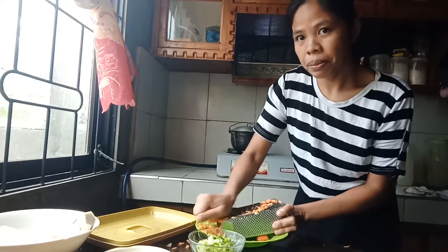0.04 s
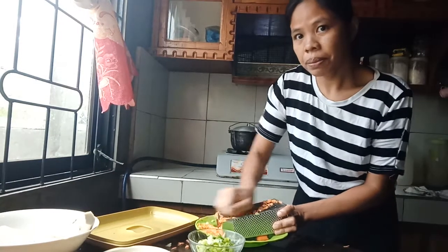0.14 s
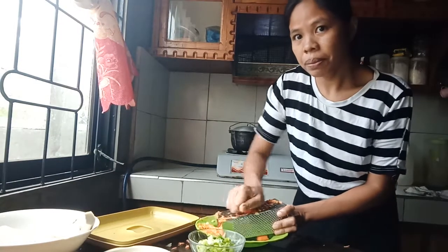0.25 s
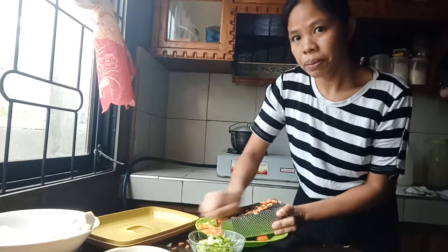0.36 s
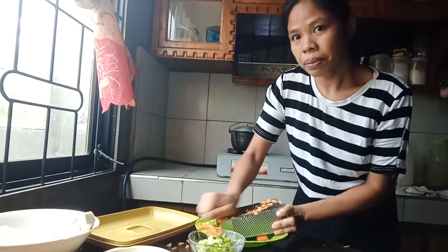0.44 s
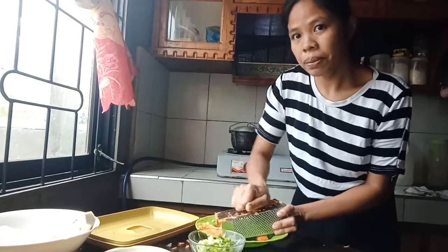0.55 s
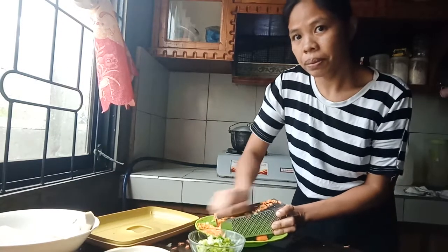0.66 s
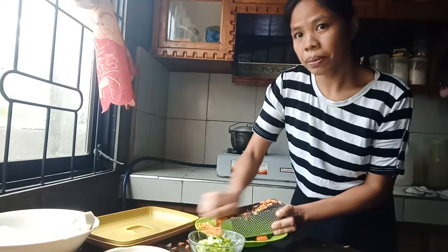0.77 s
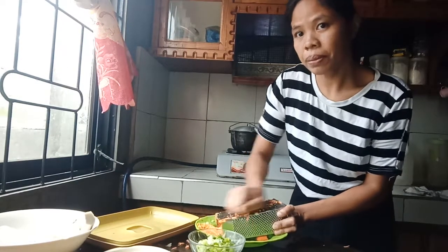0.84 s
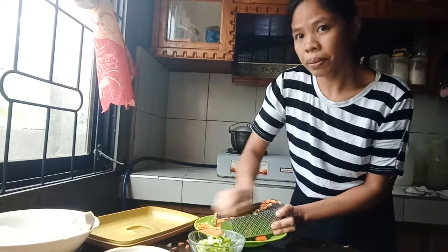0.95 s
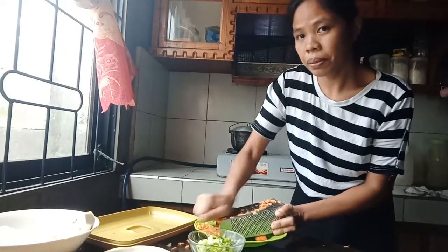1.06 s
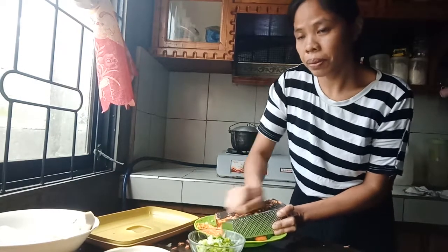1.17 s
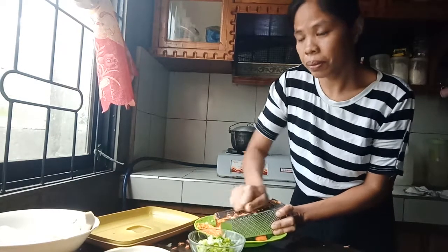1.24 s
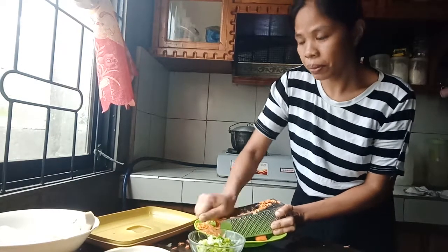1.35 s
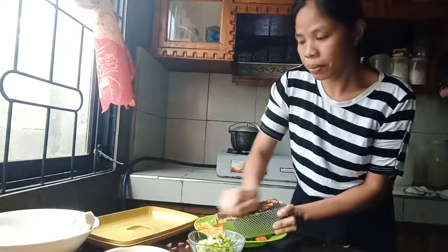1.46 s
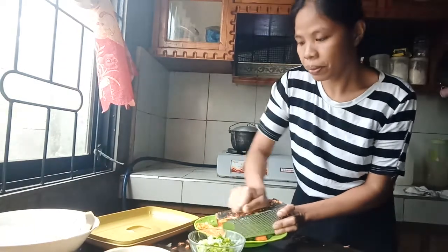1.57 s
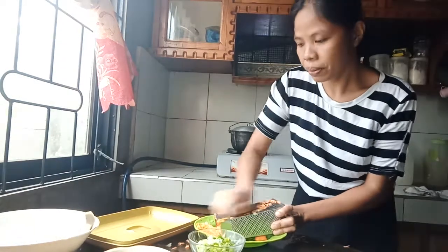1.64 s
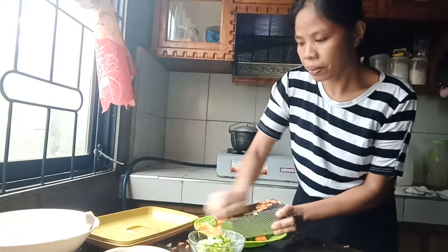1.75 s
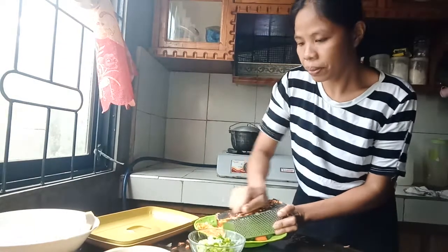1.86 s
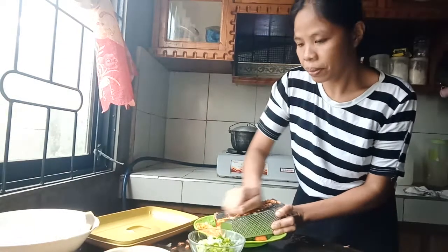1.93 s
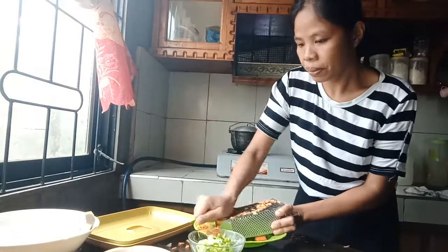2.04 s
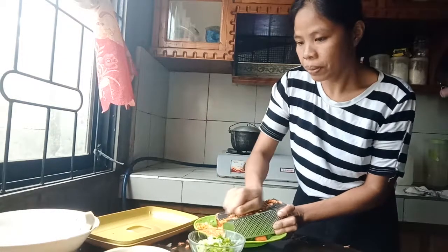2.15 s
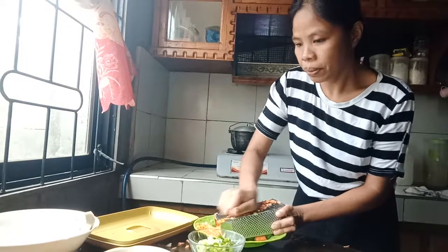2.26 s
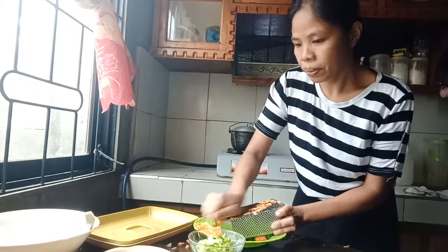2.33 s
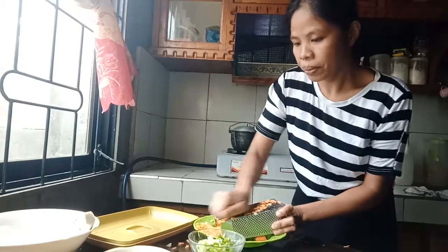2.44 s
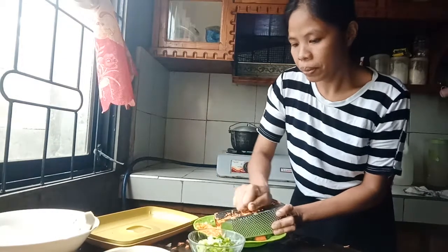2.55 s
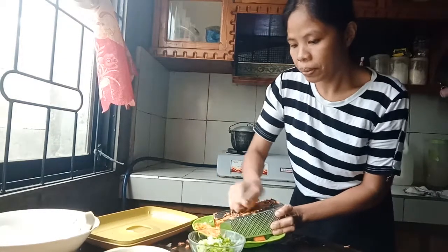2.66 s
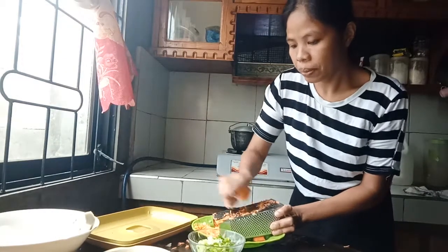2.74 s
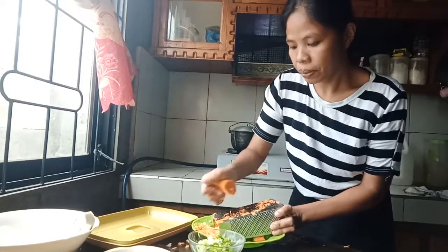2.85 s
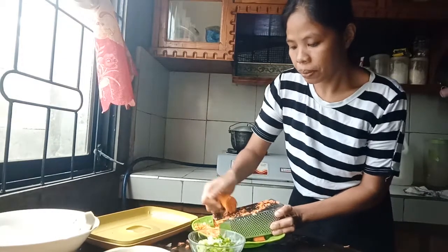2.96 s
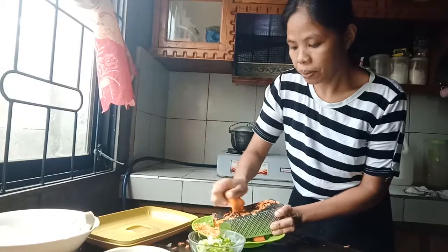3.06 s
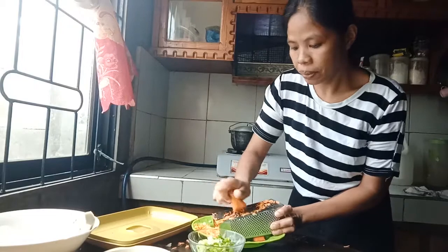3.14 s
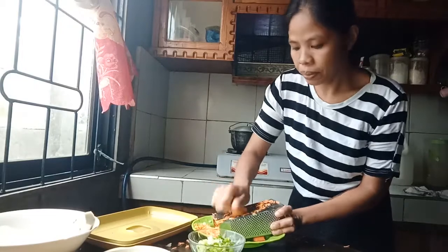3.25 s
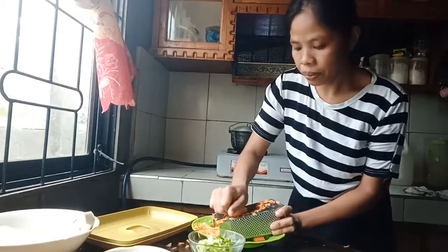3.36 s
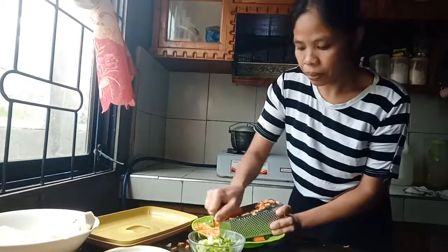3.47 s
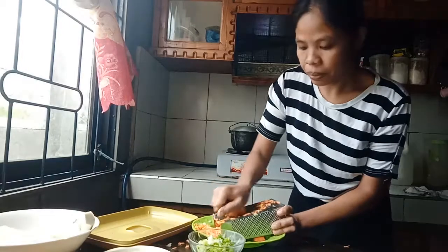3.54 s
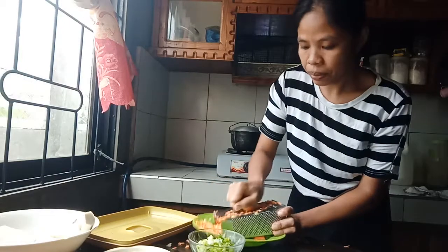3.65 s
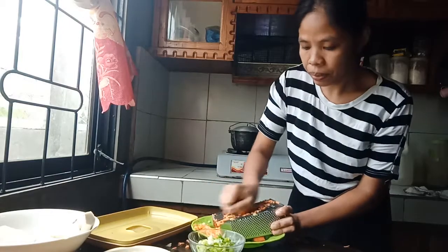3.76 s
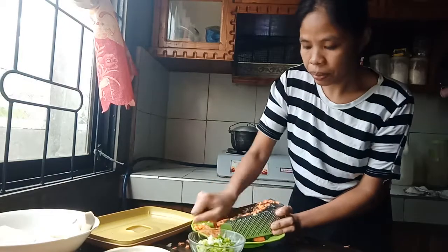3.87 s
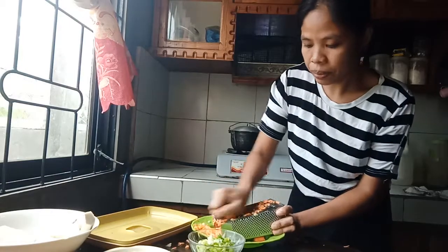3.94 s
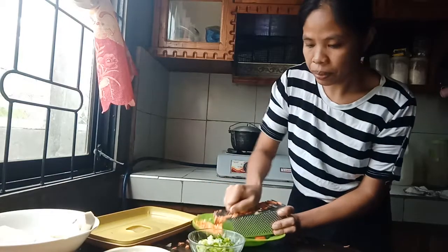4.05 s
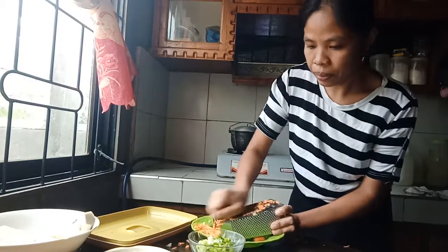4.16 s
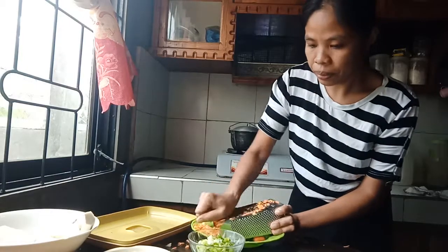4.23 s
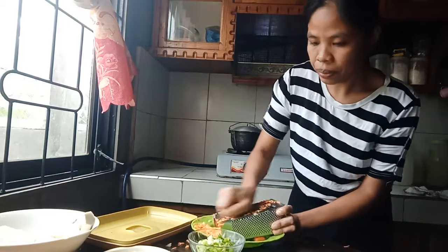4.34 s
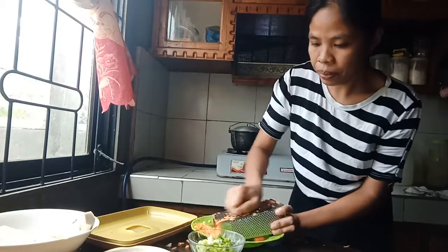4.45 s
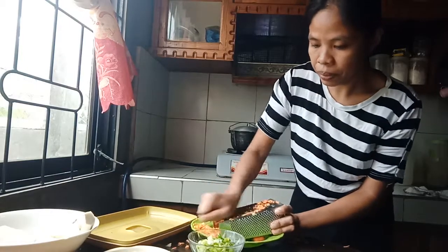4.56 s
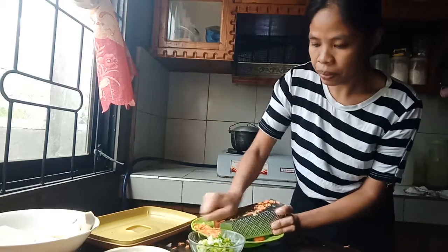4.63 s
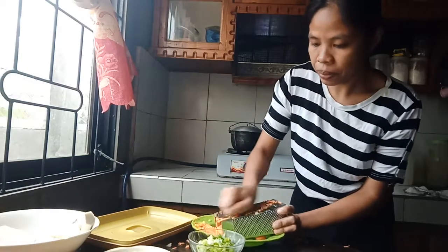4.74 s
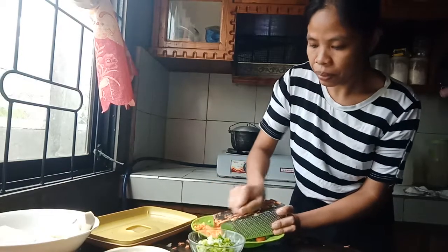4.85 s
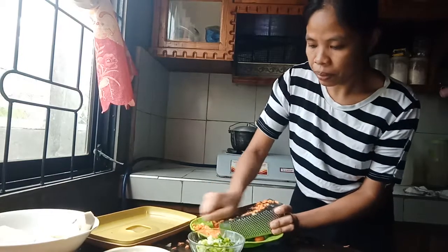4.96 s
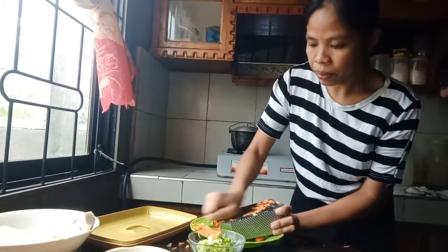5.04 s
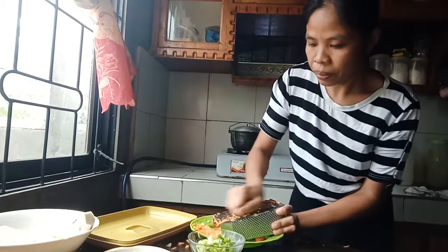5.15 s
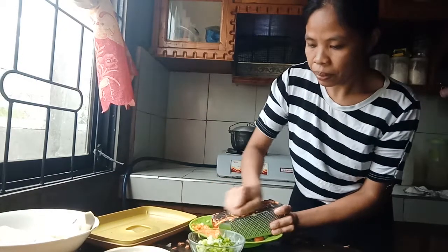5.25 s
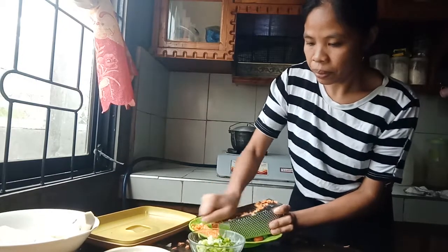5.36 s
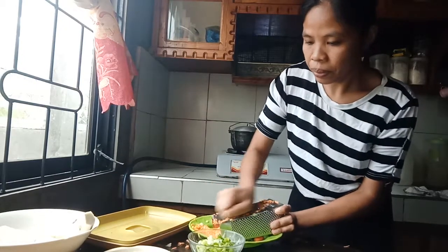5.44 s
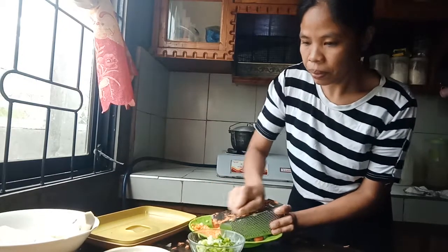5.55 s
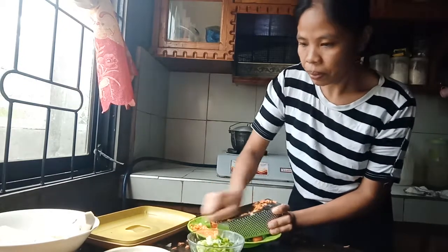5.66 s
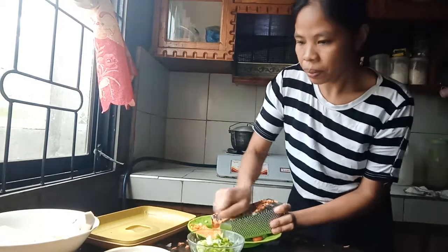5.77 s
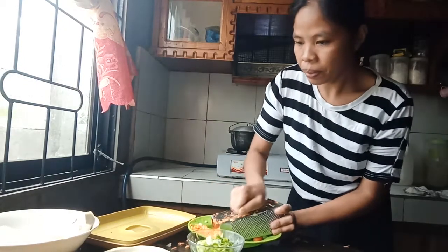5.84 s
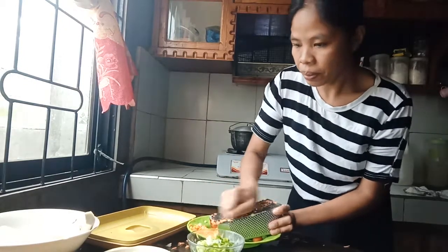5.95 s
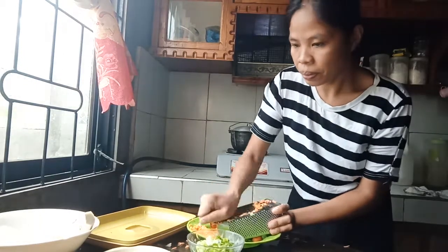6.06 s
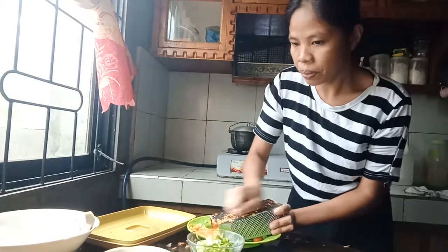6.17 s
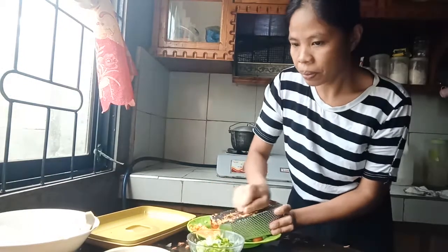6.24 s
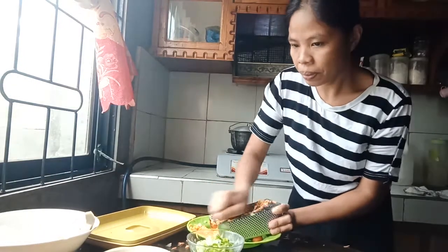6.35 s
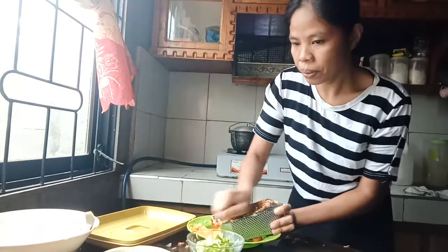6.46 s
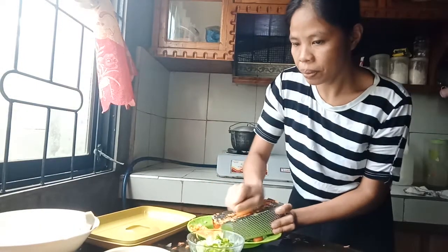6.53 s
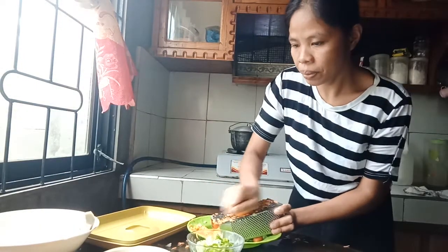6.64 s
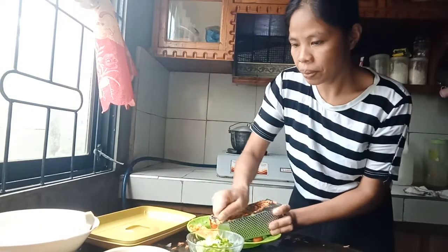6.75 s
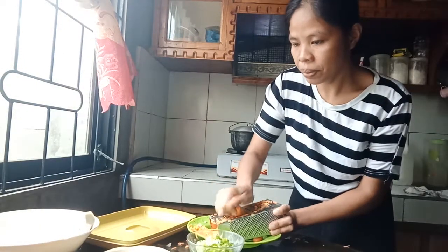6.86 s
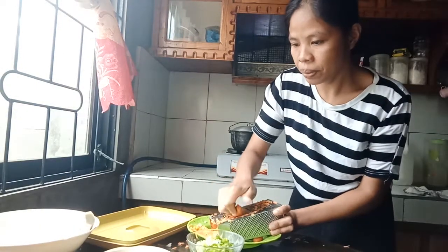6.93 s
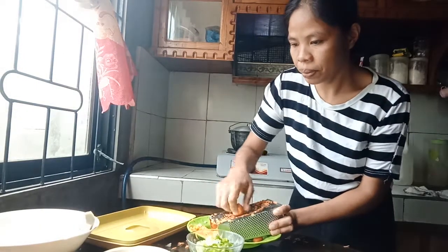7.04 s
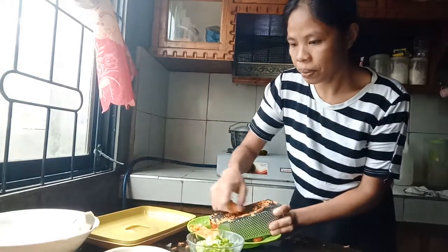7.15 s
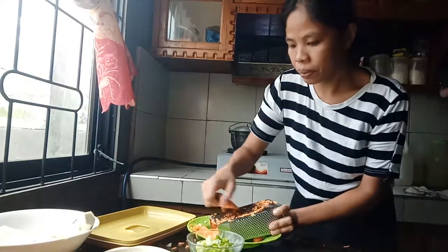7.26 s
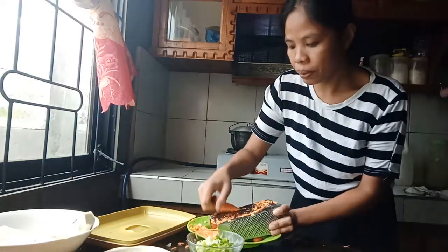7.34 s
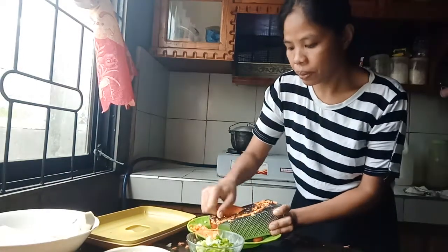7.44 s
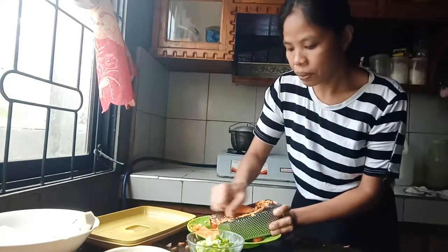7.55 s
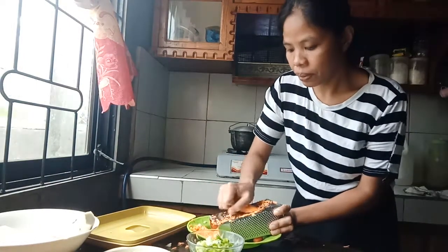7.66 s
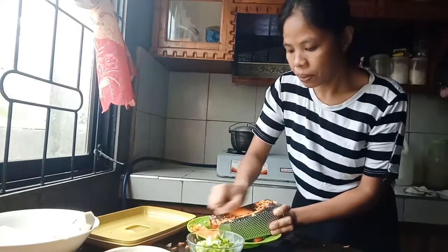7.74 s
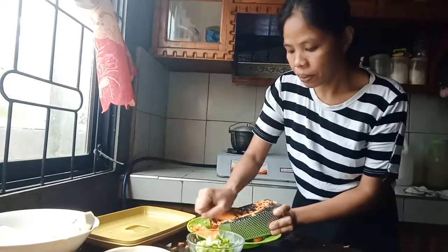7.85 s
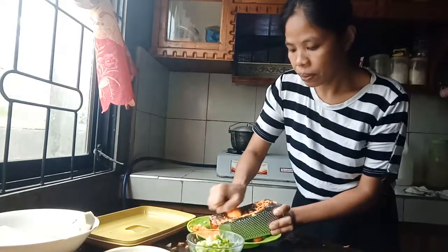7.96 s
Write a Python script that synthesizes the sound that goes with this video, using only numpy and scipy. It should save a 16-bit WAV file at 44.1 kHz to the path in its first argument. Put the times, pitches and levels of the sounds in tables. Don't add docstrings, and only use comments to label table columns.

```python
import sys
import numpy as np
from scipy import signal
from scipy.fft import rfft, irfft
from scipy.io import wavfile
from scipy.ndimage import uniform_filter1d

SR = 44100
rng = np.random.default_rng(int(sys.argv[2]) if len(sys.argv) > 2 else 0)


def to_wav(sig):
    pcm = np.clip(np.atleast_2d(sig), -1, 1) * 32767
    pcm = np.round(pcm).astype(np.int16)
    wavfile.write(sys.argv[1], SR, pcm.T)


def to_linear_factor(level_db):
    exponent = np.asarray(level_db, float) / 20
    return 10 ** exponent


N = 352800

# f/Hz, level/dB per Hz
GRATER_SPECTRUM = [(18, -60.5), (30, -30.5), (58, -9), (114, -6.5), (332, -5.5), (420, 3.5), (492, -4.5),
                   (639, 0), (2020, -5.5), (2620, -6.5), (4420, -14), (5310, -23.5), (6540, -22.5),
                   (9680, -37), (15500, -37.5)]
# t/s, peak level/dB, brightness/dB, time until clamped/s, board pitch f/Hz
KNOCKS = [(3.7345, 4, -11.5, 0.02, 772), (4.061, -6, -6, 0.011, 938), (4.093, 6.5, -11.5, 0.017, 779),
          (4.46, 6.5, -13, 0.019, 772), (4.873, 4, -10.5, 0.02, 804), (5.113, -10, -8, 0.016, 820),
          (5.2115, -1, -14, 0.019, 794), (5.411, -26.5, -1.5, 0.019, 740), (5.55, 3.5, -7, 0.017, 813),
          (5.608, -7.5, -2, 0.011, 1110), (5.895, -4.5, -4, 0.014, 890), (6.561, -20, -1.5, 0.017, 790)]
SOFT_BLOW_DULLING = 0.78


def rms_one(x):
    return x / np.sqrt(np.mean(x ** 2) + 1e-20)


def coloured(x, spectrum, modes=()):
    size = 2 ** 14
    hz = np.maximum(np.fft.rfftfreq(size, 1 / SR), 1)
    spectrum_hz, spectrum_db = np.array(spectrum).T
    db = np.interp(np.log(hz), np.log(spectrum_hz), spectrum_db)
    for mode_hz, width_hz, mode_db in modes:
        db = db + mode_db / (1 + (2 * (hz - mode_hz) / width_hz) ** 2)
    cepstrum = irfft(np.log(to_linear_factor(db)))
    cepstrum[1:size // 2] *= 2
    cepstrum[size // 2 + 1:] = 0
    impulse = irfft(np.exp(rfft(cepstrum)))
    return signal.fftconvolve(x, impulse)[:N]


def band(x, low_hz, high_hz):
    return signal.sosfilt(signal.butter(3, [low_hz, high_hz], "band", fs=SR, output="sos"), x)


def gentle_band(x, low_hz, high_hz):
    return signal.lfilter(*signal.butter(1, [low_hz, high_hz], "band", fs=SR), x)


def resonance(x, hz, width_hz):
    r = np.exp(-np.pi * width_hz / SR)
    return signal.lfilter([1, 0, -1], [1, -2 * r * np.cos(2 * np.pi * hz / SR), r * r], x)


def resonance_twice(x, hz, width_hz):
    return resonance(resonance(x, hz, width_hz), hz, width_hz)


def drift(rate_hz):
    r = np.exp(-2 * np.pi * rate_hz / SR)
    settle = SR // 4
    return rms_one(signal.lfilter([1], [1, -2 * r, r * r], rng.standard_normal(N + settle))[settle:])


def grains(per_s, spread_db, clump_db):
    sizes = to_linear_factor(spread_db * np.minimum(rng.exponential(1, N), 4)) * rng.choice([-1, 1], N)
    happens = rng.random(N) < per_s / SR
    return sizes * happens * to_linear_factor(clump_db * drift(50))


def swells(s, held_s, db, rise_rate, fall_rate, arch_db=0):
    t = np.arange(0, N + 32, 32) / SR
    columns = (s, held_s, db, rise_rate, fall_rate)
    s, held_s, db, rise_rate, fall_rate = [np.reshape(v, (-1, 1)) for v in columns]
    rise = rise_rate * np.maximum(s - t, 0)
    fall = fall_rate * np.maximum(t - s - np.abs(held_s), 0)
    place = np.clip(2 * (t - s) / np.maximum(held_s, .06) - 1, -1, 1)
    levels = db - rise - fall + arch_db * (.5 - place ** 2)
    return np.interp(np.arange(N) / SR, t, np.sqrt(np.sum(to_linear_factor(levels) ** 2, axis=0)))


def torn():
    # f/Hz, width/Hz, level/dB
    plate_modes = [(203, 24, 5), (426, 44, -2.5), (630, 76, 1.5), (800, 60, 4), (1246, 69, 6.5),
                   (1960, 250, -3.5), (2656, 310, 3), (3360, 170, 4.5), (3710, 160, 3), (6180, 420, 5.5)]
    root = coloured(grains(9000, 2.7, 1.3), GRATER_SPECTRUM, plate_modes)
    edges = np.geomspace(350, 5600, 10)
    parts = [gentle_band(root, low, high) for low, high in zip(edges, edges[1:])]
    return root + sum(0.2 * drift(15) * part for part in parts)


def played(root, kinds):
    hiss = rms_one(band(root, 5000, 18000))
    plate = rms_one(band(root, 1900, 4400))
    tray = rms_one(band(root, 25, 1900))
    arch_db = 5
    rounding_s = .006
    powers = np.zeros((3, N))
    for rows, (hiss_fall, plate_fall, tray_fall, tray_db) in kinds:
        s, held_s, hiss_db, plate_re_hiss_db, rise = np.transpose(rows)
        plate_db = hiss_db + plate_re_hiss_db
        powers += np.square([swells(s, held_s, hiss_db, rise, hiss_fall),
                             swells(s, held_s, plate_db, rise, plate_fall, arch_db),
                             swells(s, held_s, plate_db + tray_db, rise, tray_fall, arch_db)])
    rounded = uniform_filter1d(powers, int(rounding_s * SR) + 1, axis=1).clip(0)
    return np.sum(np.sqrt(rounded) * [hiss, plate, tray], axis=0)


def grating():
    # t/s at full speed, held/s, hiss level/dB, plate re hiss/dB, rise/dB per s
    pushes = [
        (0, 0.0064, -52, 15.5, 400),
        (.139, 0.057, -54, 16, 450),
        (.472, 0.056, -52.5, 16.5, 446),
        (.79, 0.048, -51.5, 15.5, 900),
        (1.115, 0.067, -53, 16.5, 500),
        (1.447, 0.068, -55, 16.5, 500),
        (1.777, 0.063, -53.5, 16.5, 402),
        (2.106, 0.063, -56, 18.5, 1000),
        (2.44, 0.091, -57, 17, 497),
    ]
    pulls = [
        (.317, 0.041, -57.5, 15.7, 348),
        (.659, 0.023, -53.5, 13.6, 690),
        (.957, 0.061, -58.5, 13.4, 350),
        (1.301, 0.035, -59, 12.6, 300),
        (1.642, 0.024, -57.5, 15.3, 348),
        (1.957, 0.034, -59, 13.7, 350),
        (2.3, 0.021, -57.5, 16.4, 800),
    ]
    feeble = [
        (3.409, 0.065, -77.5, 14.7, 500),
        (3.585, 0.04, -61, 19.4, 600),
        (6.165, 0.048, -54.5, 18, 285),
        (6.32, 0.055, -60.5, 15.7, 400),
        (6.452, 0.014, -64, 14.4, 800),
        (6.51, 0.021, -61.5, 20.3, 300),
        (6.662, .015, -70, 14, 900),
    ]
    resumed = [
        (7.578, 0.035, -76.5, 17.5, 300),
        (7.735, 0.068, -66.5, 16.4, 300),
        (7.85, 0.05, -70.5, 20.6, 1000),
        (7.95, 0.025, -68.5, 22.2, 300),
    ]
    # t/s at full speed, held/s, hiss level/dB, plate re hiss/dB
    landings = [
        (3.516, 0.0043, -66, 18),
        (3.755, .07, -57, 17),
        (4.112, 0.063, -52.5, 16.5),
        (4.481, 0.077, -52, 18.5),
        (4.893, 0.039, -48, 19.5),
        (5.279, 0.019, -54, 16),
        (5.411, 0.089, -55.5, 19),
        (5.57, 0.047, -58, 19.5),
        (5.914, .06, -85, 29),
        (6.575, 0.058, -69.5, 22.5),
    ]
    ways_back = [
        (3.953, 0.09, -57.5, 19.5),
        (4.293, 0.077, -53, 17),
        (4.653, 0.06, -58, 12),
        (4.748, 0.023, -51.5, 15.5),
        (5.055, 0.11, -53.5, 18),
        (5.739, 0.029, -56, 18.5),
        (5.81, 0.053, -54, 21),
        (5.99, 0.018, -58, 22),
    ]
    # hiss fall/dB per s, plate fall/dB per s, tray fall/dB per s, tray re plate/dB
    push_manner = (211, 161, 134, -2.5)
    pull_manner = (213, 230, 211, -1.5)
    feeble_manner = (206.5, 194, 155, -1.5)
    resumed_manner = (205, 250, 250, -4)
    landed_manner = (204, 171, 149.5, -0.5)
    return_manner = (231.5, 229, 198.5, -2)
    landed = [(*row, 2498.5) for row in landings]
    returns = [(*row, 403) for row in ways_back]
    return played(torn(), [(pushes, push_manner), (pulls, pull_manner), (feeble, feeble_manner),
                           (resumed, resumed_manner), (landed, landed_manner), (returns, return_manner)])


def air():
    # f/Hz, level/dB per Hz
    air_spectrum = [(15, -38), (25, -9.5), (44, -14), (126, -2.5), (215, -7.5), (289, -9), (537, -17),
                    (722, -16), (2010, -21.5), (3090, -19), (5430, -38.5), (6550, -34), (7300, -40),
                    (15500, -39)]
    level_db = -64 + 1.0 * drift(3.9)
    return to_linear_factor(level_db) * rms_one(coloured(rng.standard_normal(N), air_spectrum))


def hum():
    # t/s of the crest, level/dB
    throbs = [(.03, -50), (.35, -62), (.55, -65), (.92, -54), (1.17, -56), (1.39, -53), (1.62, -53),
              (1.87, -52.5), (2.33, -54), (2.65, -57), (3.13, -67), (3.61, -54.5), (4.3, -56.5),
              (4.62, -49.5), (4.77, -50.5), (5.1, -57), (5.49, -55.5), (5.8, -61), (6.37, -49), (6.59, -50),
              (6.85, -58), (7.06, -55), (7.34, -56), (7.52, -56), (7.79, -60)]
    thump_lag_s, thump_db = 0.047, -53.5
    floor_db, sink_db_per_s2 = -70, 1201
    t = np.arange(0, N + 64, 64) / SR
    thumps = [(knock[0] + thump_lag_s, knock[1] + thump_db) for knock in KNOCKS]
    crests = list(throbs) + thumps
    power = to_linear_factor(floor_db) ** 2 + sum(to_linear_factor(db - sink_db_per_s2 * (t - s) ** 2) ** 2 for s, db in crests)
    gain = np.interp(np.arange(N) / SR, t, np.sqrt(power))
    pitch_hz = 121.3 + 3 * drift(5.95)
    return gain * np.sin(2 * np.pi * np.cumsum(pitch_hz) / SR)


def taps():
    # t/s, peak level/dB, pitch f/Hz, t60/s, crack re peak/dB
    tap_rows = [(0.03, -26, 636, 0.03, -24), (0.269, -32.5, 1257, 0.064, 0.5),
                (0.328, -35, 624, 0.06, -25.5), (0.382, -23, 650, 0.043, -15), (0.467, -43, 1310, 0.04, 7),
                (0.576, -37, 1290, 0.085, -2), (1.005, -28.5, 620, 0.069, -16),
                (1.529, -30.5, 773, 0.062, -20), (1.606, -31, 1440, 0.031, -8),
                (1.916, -35.5, 780, 0.03, 4.5), (2.1, -38, 2190, 0.06, -20), (2.265, -32.5, 630, 0.046, -2),
                (2.95, -60.5, 540, 0.075, 2), (3.282, -57.5, 1400, 0.076, 4),
                (3.515, -36.5, 1390, 0.04, -3), (3.698, -35.5, 1233, 0.053, 2.5),
                (4.0345, -31, 1220, 0.09, -2), (5.048, -30, 1630, 0.04, 0), (5.276, -29, 850, 0.031, -22),
                (5.794, -30, 1210, 0.033, 1), (5.498, -29.5, 903, 0.04, -1.5), (6.155, -30, 1805, 0.063, 4),
                (6.75, -27, 984, 0.026, -12), (7.843, -47, 1300, 0.042, 7)]
    noise = rms_one(band(coloured(rng.standard_normal(N), GRATER_SPECTRUM), 500, 4500))
    out, t = np.zeros(N), np.arange(6000) / SR
    for s, db, hz, t60, crack_db in tap_rows:
        at = round(s * SR) + np.arange(len(t))
        mode = np.sin(2 * np.pi * hz * t) + 0.52 * np.sin(2 * np.pi * 1.17 * hz * t)
        mode = mode * (1 - np.exp(-t / 0.00029)) * to_linear_factor(-60 * t / max(t60, .01))
        crack_fall = 2 * to_linear_factor(-60 * t / 0.009) + .15 * to_linear_factor(-60 * t / .25)
        crack = to_linear_factor(crack_db) * noise[at] * (1 - np.exp(-t / 0.00061)) * crack_fall
        out[at] += to_linear_factor(db) * (mode + crack)
    return out


def ticks():
    # t/s, peak level/dB, pitch f/Hz
    tick_rows = [(.1226, -34, 622), (.4544, -33, 2310), (.4658, -22, 3900), (.6574, -34, 3700),
                 (.7811, -33, 3110), (.7921, -30, 1350), (1.1039, -33, 2780), (1.81, -27, 2500),
                 (5.7951, -26, 1210), (6.156, -28, 1830), (6.71, -42, 600), (3.745, -14, 1400),
                 (1.4262, -33, 1420), (1.7469, -36, 2350), (2.1011, -35, 2310), (2.2473, -38, 1260),
                 (2.307, -33, 1200), (2.4144, -36, 2290), (3.283, -62, 2400), (3.5138, -36, 2400),
                 (3.524, -42, 3500), (3.5811, -36, 2670), (3.7717, -19, 1900), (4.0341, -28, 2600),
                 (4.0606, -13, 2000), (4.1294, -19, 1690), (4.9091, -20, 1700), (5.0508, -26, 1630),
                 (5.1137, -14, 2600), (5.121, -18, 1660), (5.1501, -24, 1640), (5.2119, -24, 2100),
                 (5.2788, -24, 2350), (5.4105, -27, 3300), (5.4858, -26, 2050), (5.498, -24.5, 2050),
                 (5.5495, -6.5, 2050), (5.6085, -11, 1700), (5.611, -12, 2100), (5.7283, -18, 2430),
                 (5.7622, -29, 2670), (5.826, -22, 816), (5.882, -33, 4200), (5.8948, -9, 2050),
                 (5.943, -19, 1300), (5.98, -20, 1100), (6.156, -25, 750), (6.1867, -28, 1750),
                 (6.3099, -30, 1190), (6.4526, -41, 2580), (6.5055, -31.5, 842), (6.5634, -27, 3600),
                 (7.843, -46, 2350)]
    cycles, partner_ratio = 16, 1.23
    out, t = np.zeros(N), np.arange(1500) / SR
    attack = 1 - np.exp(-(t / .0005) ** 2)
    for s, db, hz in tick_rows:
        pair = np.sin(2 * np.pi * hz * t) + .6 * np.sin(2 * np.pi * partner_ratio * hz * t)
        out[round(s * SR):][:len(t)] += to_linear_factor(db - 2.5) * pair * attack * to_linear_factor(-60 * t * hz / cycles)
    return out


def singing():
    # t/s, length/s, pitch f/Hz, width/Hz
    singing_rows = [(3.67, .035, 2720, 60), (3.74, .18, 1760, 40), (4.1, .12, 1700, 35),
                    (4.47, .16, 1715, 60), (4.5, .07, 3430, 40), (6.78, .36, 3500, 500),
                    (6.03, .09, 1550, 50), (6.16, .125, 1880, 60), (2.95, .55, 1505, 2),
                    (7.32, .2, 715, 30), (7.945, .035, 2650, 200), (7.575, .06, 450, 200),
                    (3.39, .09, 2150, 60), (1.92, .12, 220, 60), (4.88, .13, 1690, 50),
                    (5.56, .12, 1700, 70), (6.33, .06, 680, 80), (6.575, .07, 1600, 150),
                    (7.72, .07, 2600, 200), (7.59, .035, 2550, 150), (7.76, .05, 700, 120),
                    (4.74, .05, 3400, 120), (3.95, .08, 2550, 40), (5.04, .05, 2300, 80)]
    singing_levels = [-43.5, -33, -32, -31.5, -41, -68, -44, -45, -79.5, -78, -51, -57, -67, -49, -36, -31,
                      -45, -41, -58, -60.5, -55, -43, -47, -41]
    out = np.zeros(N)
    for (s, length_s, hz, width_hz), db in zip(singing_rows, singing_levels):
        settled = resonance_twice(rng.standard_normal(SR * 2 // 3), hz, 2.3 * width_hz)
        run = settled[-int(length_s * SR):]
        swell = signal.windows.tukey(len(run), .3) * to_linear_factor(np.linspace(2, -4, len(run)))
        out[round(s * SR):][:len(run)] += to_linear_factor(db) * rms_one(run) * swell
    return out


def cricket():
    # t/s, peak level/dB
    chirps = [(2.604, -69), (2.7237, -76.5), (2.8544, -76), (2.9844, -72), (3.1223, -78.5), (3.2544, -75),
              (3.3707, -72), (6.735, -72), (6.81, -76), (6.9461, -72), (7.0828, -78), (7.216, -76),
              (7.3462, -74), (7.4759, -72.5), (7.6547, -72)]
    out, t = np.zeros(N), np.arange(600) / SR
    for s, level_db in chirps:
        for lag_s, db, hz in [(-.004, -4, 6730), (.014, -1.5, 6700), (.032, -12, 6600)]:
            at = round((s + lag_s) * SR)
            out[at:at + 600] += to_linear_factor(level_db + db) * np.hanning(600) * np.sin(2 * np.pi * hz * t)
    return out


def dishes():
    # f/Hz, level/dB per Hz
    board_spectrum = [(24, -64), (40, -31), (207, -5.5), (397, -6.5), (484, -4), (778, -2), (1190, -3),
                      (1730, -1), (3300, -12.5), (5300, -28), (6010, -36), (15500, -70)]
    # f/Hz, width/Hz, level/dB
    dish_modes = [(213, 23, 5), (400, 50, 4.5), (591, 25, 5), (676, 23, 5), (789, 20, 8), (800, 11, -5),
                  (850, 16, 8.5), (984, 9.2, 4), (1117, 25, 1.5), (1293, 7.2, 8), (1370, 57, 3.5),
                  (1493, 15, -9.5), (1650, 11, 9), (1690, 19, -0.5), (2040, 20, 7), (2260, 28, 1.5),
                  (2380, 50, 1.5), (2560, 23, -7), (3400, 46, 7.5), (3943, 220, 9), (4330, 90, 5)]
    shake = rms_one(grains(4000, 2.6, 1.7))
    ringing = sum(to_linear_factor(db + 2.6 * drift(4.1)) * resonance(shake, hz, width_hz) * np.pi * width_hz / SR
                  for hz, width_hz, db in dish_modes)
    return coloured(1.34 * shake + ringing, board_spectrum, [(5300, 310, -6.5), (6220, 1000, 10.5)])


def knocks(ringing):
    # f/Hz, level/dB, t60/s
    struck_modes = [(677, -11.5, 0.11), (970, -12, 0.075), (1350, -8.5, .1), (1720, -9.5, 0.085),
                    (2050, -10.5, .12), (2430, -13, 0.11), (2750, -17.5, 0.083), (3390, -20, 0.11),
                    (4050, -19.5, 0.065)]
    lower = rms_one(band(ringing, 150, 1600))
    upper = rms_one(band(ringing, 1100, 4600))
    top = rms_one(band(ringing, 4600, 13000))
    air_noise = band(rng.standard_normal(N), 7000, 18000)
    out, t = np.zeros(N), np.arange(2200) / SR
    late = 1 - np.exp(-(t / .004) ** 3)
    crack_shape = (1 - np.exp(-t / 0.0012)) * (to_linear_factor(-350 * t) + 0.32 * to_linear_factor(-2500 * t))
    for s, db, bright_db, hold_s, hz in KNOCKS:
        at = round((s - .0015) * SR) + np.arange(len(t))
        clamp = 1 / (1 + np.exp(np.clip((t - hold_s) / 0.00085, -50, 50)))
        boom = late * to_linear_factor(-300 * t) * (0.77 * np.sin(2 * np.pi * hz * t) + 0.43 * rms_one(lower[at]))
        crack_noise = rms_one(upper[at]) + to_linear_factor(-21 + SOFT_BLOW_DULLING * db) * rms_one(top[at])
        crack = crack_shape * to_linear_factor(bright_db + 4.5) * crack_noise
        struck = np.zeros(len(t))
        for mode_hz, mode_db, t60 in struck_modes:
            fading = to_linear_factor(mode_db + rng.normal(0, 3) - 60 * t / t60)
            struck += fading * np.sin(2 * np.pi * mode_hz * t + rng.uniform(0, 5.94))
        crack = 0.79 * crack + (1 - np.exp(-(t / 0.0017) ** 2)) * to_linear_factor(bright_db + 6) * struck
        spit = to_linear_factor(-50.5 + 0.99 * db - 430 * t) * air_noise[at]
        out[at] += to_linear_factor(db - 8.5) * clamp * (boom + crack + spit)
    return out


def rings():
    # t/s, length/s, pitch f/Hz, level/dB
    ring_rows = [(3.76, .07, 790, -34), (3.875, .055, 840, -34), (3.74, .13, 2430, -36.5),
                 (3.775, .05, 2750, -39), (3.76, .04, 2030, -37), (3.87, .09, 2020, -43.5),
                 (4.112, .02, 800, -27), (4.152, 0.053, 795, -24.5), (4.232, .046, 805, -27),
                 (4.32, .04, 790, -38), (4.485, .025, 860, -26.5), (4.518, 0.047, 790, -26),
                 (4.6, .05, 850, -28.5), (4.7, 0.072, 770, -39), (4.93, 0.062, 815, -24.5),
                 (4.9, .02, 815, -28), (5.005, 0.056, 820, -29), (5.277, .125, 3320, -45),
                 (5.114, .092, 1685, -30), (5.41, .025, 3320, -40), (4.47, .12, 1715, -33),
                 (3.75, .12, 1740, -33), (4.105, .115, 1700, -33), (5.355, .035, 800, -44),
                 (6.2, 0.092, 1600, -48), (6.03, .085, 1550, -45), (5.277, .036, 820, -34),
                 (5.62, 0.058, 820, -32), (5.69, .05, 800, -40), (5.93, .07, 1280, -34.5),
                 (5.57, 0.061, 2050, -33), (5.57, .08, 1276, -31), (4.47, .1, 1400, -33),
                 (4.11, .1, 1350, -34)]
    wobble_hz = 10 * drift(60)
    flutter = to_linear_factor(1.6 * drift(70))
    out = np.zeros(N)
    for s, length_s, hz, db in ring_rows:
        at = round(s * SR) + np.arange(int(length_s * SR))
        swell = signal.windows.tukey(len(at), .25) * to_linear_factor(np.linspace(0, -3, len(at)))
        tone = np.sin(2 * np.pi * np.cumsum(hz + wobble_hz[at]) / SR)
        out[at] += to_linear_factor(db + 3) * swell * flutter[at] * tone
    return out


def rattle(body):
    # t/s, lower modes level/dB, upper modes level/dB, held/s, fall/dB per s
    rattle_rows = [(3.755, -25, -23.5, 0.038, 89.5), (4.074, -36.5, -28.5, 0.0028, 900),
                   (4.112, -27.5, -23.5, 0.071, 100), (4.48, -26.5, -24, 0.045, 69),
                   (4.893, -26.5, -24, 0.063, 136), (5.13, -40.5, -32, 0.016, 98),
                   (5.23, -34.5, -31, 0.063, 161), (5.566, -24.5, -20, 0.007, 100.5),
                   (5.911, -28, -24, 0.026, 127.5), (6.575, -46.5, -38.5, 0.033, 120),
                   (6.752, -53, -52, 0.018, 170)]
    s, lower_db, upper_db, held_s, fall = np.transpose(rattle_rows)
    top_db = upper_db - 10.5 + SOFT_BLOW_DULLING * (upper_db + 24)
    rise = 1499.5
    lower = swells(s, held_s, lower_db, rise, fall)
    upper = swells(s, held_s, upper_db, rise, fall)
    top = swells(s, held_s, top_db, rise, fall)
    lower_body = rms_one(band(body, 30, 1000))
    upper_body = rms_one(gentle_band(band(body, 950, 3200), 1100, 2300))
    top_body = rms_one(band(body, 2600, 12000))
    return lower * lower_body + upper * upper_body + top * top_body


def judder():
    # f/Hz, width/Hz
    table_modes = [
        (122, 11.6),
        (460, 51),
        (830, 90),
    ]
    gate = swells(7.874, 0, 0, 510, 30)
    slips = gate * grains(2000, 0.88, 1.1)

    def even(x):
        return x / np.sqrt(uniform_filter1d(x ** 2, 1500) + 1e-3 * np.max(x ** 2))

    low, high, top = [even(resonance_twice(slips, hz, width_hz)) for hz, width_hz in table_modes]
    scrape = even(band(slips, 168, 420))
    return gate * to_linear_factor(-33) * (low + to_linear_factor(-8.5) * (high + 0.2 * top + 0.5 * scrape))


def kitchen(x):
    t60_s, tail_db = 0.64, -19
    t = np.arange(SR) / SR
    tail = band(rng.standard_normal(SR), 250, 4300) * to_linear_factor(-60 * t / t60_s) * (1 - np.exp(-t / 0.01))
    return x + to_linear_factor(tail_db) * signal.fftconvolve(x, tail / np.sqrt(np.sum(tail ** 2)))[:N]


def scene():
    body = dishes()
    table = rattle(body) + knocks(body) + singing() + rings() + ticks() + judder()
    return (kitchen(grating() + taps()) + table + hum() + cricket() + air())[None]


def roll_off(x):
    return signal.sosfilt(signal.butter(12, 15960, fs=SR, output="sos"), x)


def record(dry):
    heard = signal.sosfilt(signal.butter(2, 60, "high", fs=SR, output="sos"), dry)
    rounded = 1.23 * np.tanh(heard / 1.143)
    top_cut = signal.ellip(12, .5, 70, 15560, fs=SR, output="sos")
    mix = signal.sosfilt(top_cut, rounded)
    return roll_off(mix)


dry = scene()
out = record(dry)
to_wav(out)
```